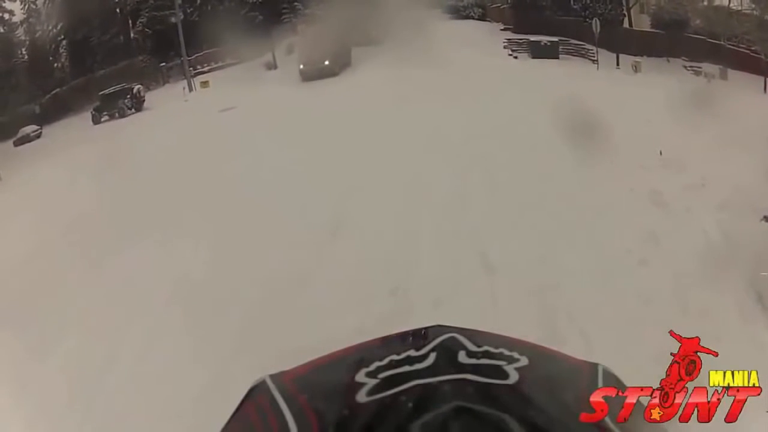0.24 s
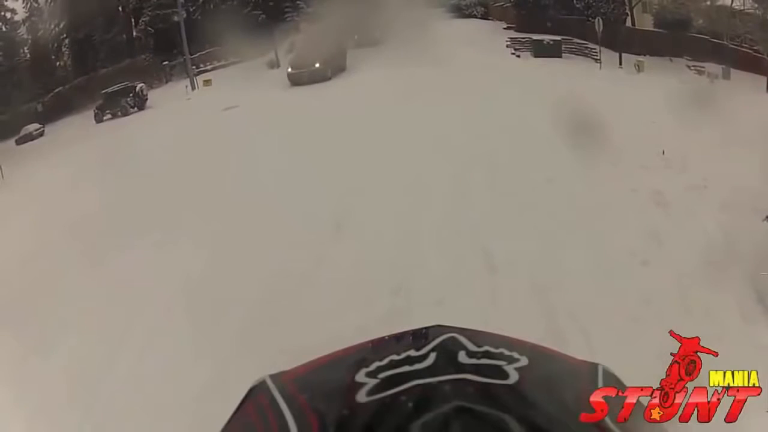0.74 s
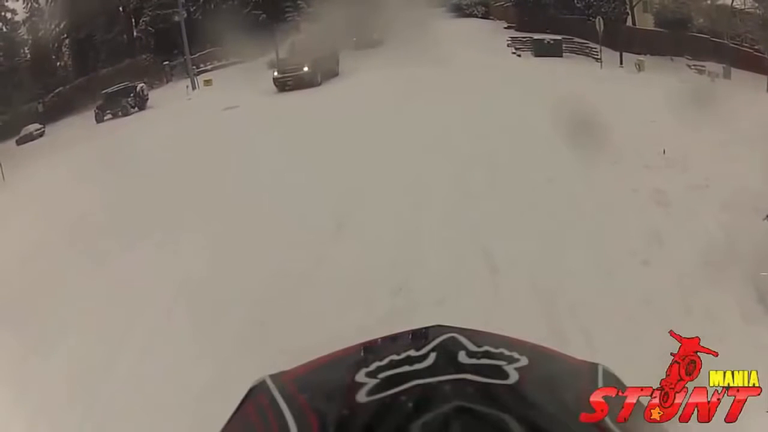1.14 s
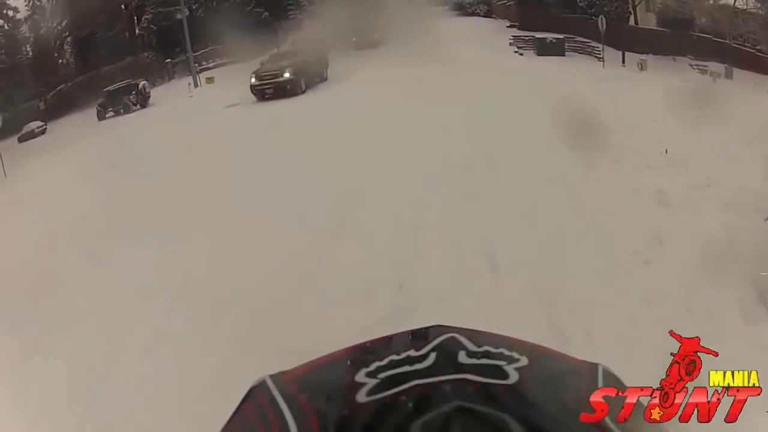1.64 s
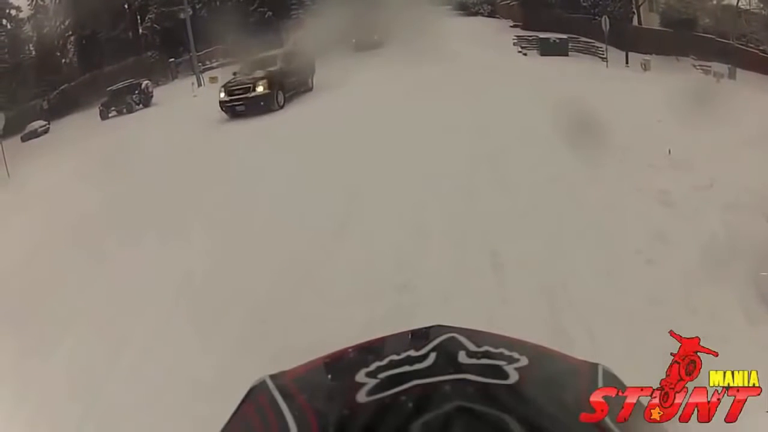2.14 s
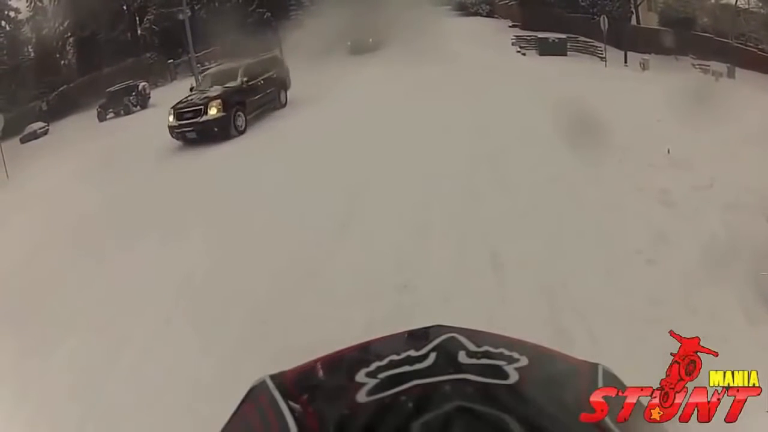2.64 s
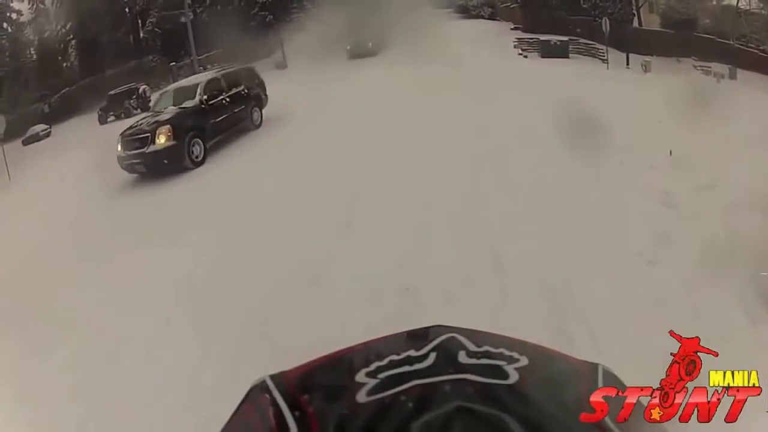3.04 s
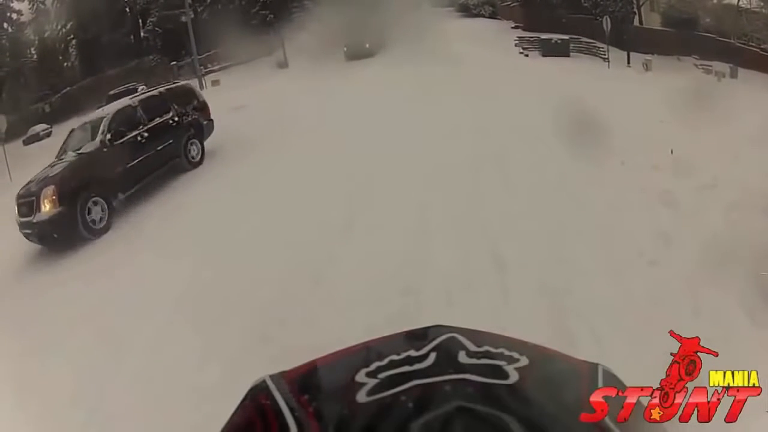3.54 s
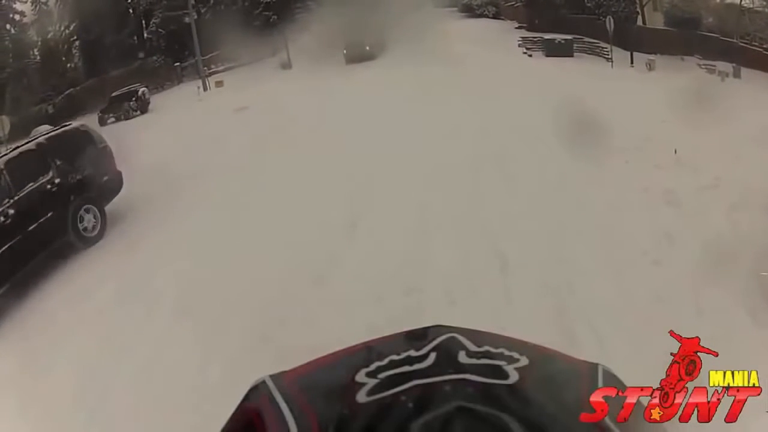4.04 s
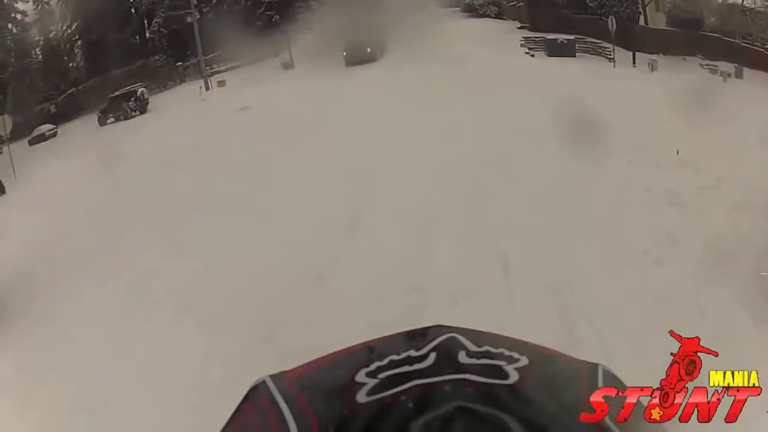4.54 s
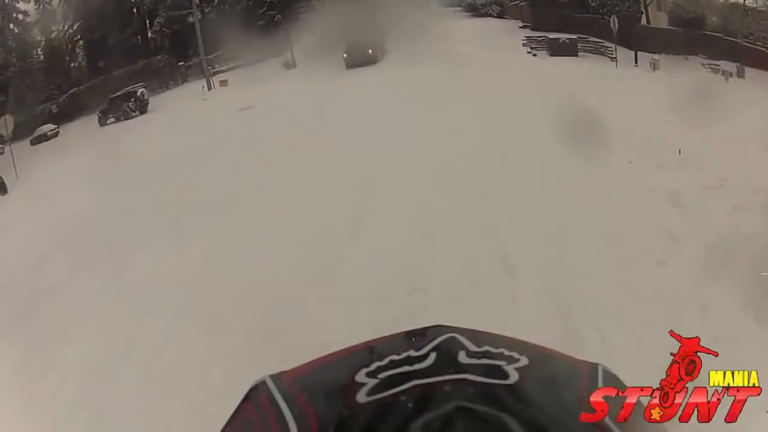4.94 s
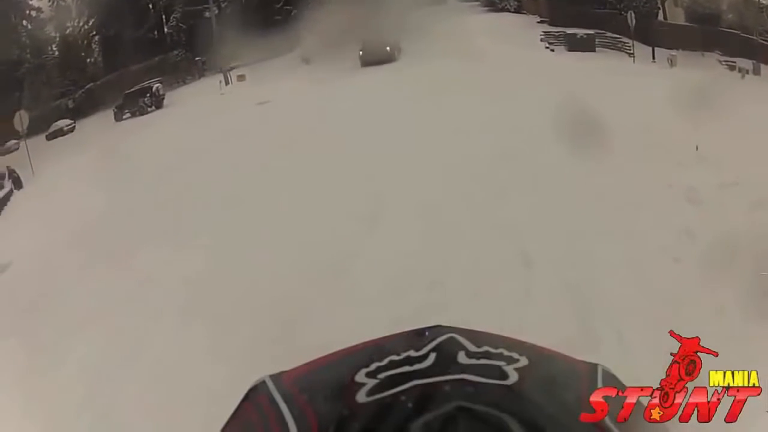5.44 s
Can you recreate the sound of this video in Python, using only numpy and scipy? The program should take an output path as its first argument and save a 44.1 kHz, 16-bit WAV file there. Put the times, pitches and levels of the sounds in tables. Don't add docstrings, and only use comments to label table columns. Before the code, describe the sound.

A two-stroke quad engine idles fast and unevenly close up, distorted and muffled, jumping abruptly louder early on and then holding steady.

```python
import sys
import numpy as np
from scipy import signal
from scipy.fft import rfft, irfft
from scipy.io import wavfile
from scipy.ndimage import uniform_filter1d, minimum_filter1d

SR = 44100
rng = np.random.default_rng(int(sys.argv[2]) if len(sys.argv) > 2 else 0)


def voltage_ratio(decibels):
    exponent = np.asarray(decibels, float) / 20
    return 10 ** exponent


def persist_wave(psi):
    counts = np.round(np.clip(psi, -1, 1) * 32767).astype(np.int16)
    wavfile.write(sys.argv[1], SR, np.atleast_2d(counts).T)


N = 250929
TURNS_PER_S = 60.5
OVERLOAD_DB = -6


def evened(x):
    return x / np.sqrt(np.mean(x ** 2) + 1e-20)


# start in seconds, blow in dB,
# delay of the second in seconds, its blow in dB.
HARD_PAIRS = [(0.0073, 3.5, 0.0151, -11.5), (0.1209, 3, 0.0492, 1.9), (0.2812, 2, 0.049, 0.5),
              (0.4097, 3.5, 0.0492, 1.5), (0.5406, 3.5, 0.0328, 1.8), (0.7404, 3.5, 0.0337, 0),
              (1.0085, 2, 0.0493, 3.7), (1.1735, 0.2, 0.0319, 1), (1.3059, 0.5, 0.0326, 0.9),
              (1.4191, 3.7, 0.0494, 1.0), (1.5493, 0.7, 0.0332, 0), (1.7634, 3, 0.0152, -9.5),
              (1.8422, 3.5, 0.0326, -1.7), (2.0024, 3.4, 0.0328, 2.5), (2.196, 2.5, 0.0503, 2.5),
              (2.36, 2.5, 0.0169, -1.5), (2.9619, 3, 0.0332, 0.8), (3.1433, 3, 0.0502, 3),
              (3.2597, 2.3, 0.0167, -6), (3.4065, 2.5, 0.0491, 1.7), (3.585, 2.1, 0.0165, 1.5),
              (3.684, 2, 0.0169, 3.2), (3.913, 2.7, 0.0344, 2), (4.1795, 1.5, 0.0344, 2),
              (4.4324, 2.5, 0.0509, 1.7), (4.5511, 3, 0.0512, -1), (4.6845, 0.3, 0.0171, 1.5),
              (4.7519, 1.9, 0.0334, 3.5), (5.2712, 1.6, 0.033, 2), (5.4953, 1, 0.0327, 1)]
# start in seconds, blow in dB.
MORE_HARD_FIRINGS = [(0.0873, 0.2), (0.2015, -0.2), (0.908, 3), (0.9761, 1.8), (1.157, 2.5), (1.6484, -0.5),
                     (1.6808, -1.7), (2.067, 0), (2.2624, -0.5), (2.49, 0.5), (2.5073, 1.5), (2.6243, -0.9),
                     (2.6586, -0.5), (3.0285, -1.5), (3.4551, 1.3), (3.4722, 0.4), (3.5195, 1.5), (3.7789, -1),
                     (4.0959, 3.5), (4.8985, 4.5), (5.0296, 4.5), (5.143, 3), (5.3363, 2.1), (5.4625, 0),
                     (0.9248, 0), (1.615, -1.5), (2.0519, -3.5), (2.409, 0.5), (3.9652, -2), (5.2544, -.5)]
# catch in seconds, dead time before it in seconds,
# blow on catching in dB.
STALLS = [(0.0552, 0.033, -2.5), (0.2479, 0.033, -5), (0.3773, 0.033, -3.5), (1.1058, 0.033, -5),
          (1.2723, 0.05, -2.5), (1.9694, 0.033, -3), (2.1459, 0.05, -0.5), (2.309, 0.033, -5.5),
          (2.4738, 0.033, -0.5), (3.1259, 0.033, -3), (3.3567, 0.033, 3), (3.569, 0.033, -1.5),
          (3.6501, 0.033, -3), (4.0607, 0.033, -5.5), (4.315, 0.033, 2.3), (5.11, 0.05, 3),
          (5.3827, 0.033, 0), (5.6578, 0.033, -0.2)]
# catch one turn later in seconds, blow on catching in dB.
MISFIRES = [(0.4908, -0.5), (0.6218, 1), (0.8243, -3), (0.8578, 0), (1.0409, -11), (1.5323, -10.5),
            (1.7299, 2), (1.8088, -7), (1.9224, 2), (2.1793, -2), (2.3434, -0.5), (2.5905, -0.5),
            (2.743, 1), (2.8288, 2.5), (3.0766, 3.4), (3.3082, 1.7), (3.747, -1), (3.8288, 0.5),
            (4.2477, -0.5), (4.398, 0), (4.585, 1), (4.6346, -8.5), (4.865, -11.5), (4.9459, 4),
            (5.1895, 0.5), (5.2213, -9), (5.414, -0.5), (5.4455, -1.5), (5.5769, -5.5), (5.6098, 3.3)]


def marked():
    first = [(s, db) for s, db, _, _ in HARD_PAIRS]
    second = [(s + later_s, db) for s, _, later_s, db in HARD_PAIRS]
    catches = [(s, db) for s, _, db in STALLS]
    return np.array(sorted(first + second + MORE_HARD_FIRINGS + MISFIRES + catches))


def shaft():
    s = marked()[:, 0]
    turns = np.r_[0, np.cumsum(np.round(np.diff(s) * TURNS_PER_S))]
    times = np.r_[-1, s, s[-1] + 1]
    return times, np.r_[-(s[0] + 1) * TURNS_PER_S, turns, turns[-1] + TURNS_PER_S]


def firings():
    ordinary_db, starved_db, stalled_db, misfired_db = -3, -6, -15.5, -14.5
    scatter_db, cap_db, hard_db = -1.5, -2.5, 1.0
    s, turns = shaft()
    at = np.interp(np.arange(turns[-2] + 2), turns, s)
    turn, marked_db = turns[1:-1].astype(int), marked()[:, 1]

    charge_db = np.full(len(at), float(ordinary_db))
    hard = turn[marked_db > hard_db]
    charge_db[np.r_[hard[1:] - 1, hard + 1]] = starved_db
    chance = np.clip(rng.standard_normal(len(at)), -2, 2)
    blow_db = np.minimum(charge_db + scatter_db * chance, cap_db)

    half_turn_s = 0.5 / TURNS_PER_S
    dead_spans = [(catch, dead_s, stalled_db) for catch, dead_s, _ in STALLS]
    dead_spans += [(catch, 2 * half_turn_s, misfired_db) for catch, _ in MISFIRES]
    for catch, dead_s, db in dead_spans:
        blow_db[(at > catch - dead_s - half_turn_s) & (at < catch - half_turn_s)] = db
    blow_db[turn] = marked_db
    return at, blow_db


# frequency in Hz, level in dB, t60 in seconds.
PIPE_MODES = [(120.5, -41, 0.36), (243.8, -11, 0.077), (319.4, -10, 0.082), (345.6, -8.5, 0.11),
              (500, -51.5, 0.22), (562.5, -15.5, 0.03), (612.4, -30, 0.097), (694, -18.5, 0.067),
              (44, -54, 0.0099)]


def exhaust(at, blow_db):
    rise_s, lag_rad, detune, uneven_db = 0.0018, -0.3, 0.007, 1.1
    ringing_share = 0.71
    hz, db, t60_s = np.transpose(PIPE_MODES)[:, :, None]
    lead, out = 300, np.zeros(N + 6000)
    t = (np.arange(4000) - lead) / SR
    swell = np.exp(-(np.minimum(t, 0) / rise_s) ** 2)
    fade = voltage_ratio(db - 60 * np.maximum(t, 0) / t60_s) * swell / voltage_ratio(db).sum()
    phase = lag_rad * np.tanh(t / rise_s)
    chance = rng.standard_normal((len(at), 2, len(hz), 1))
    for s, level_db, (pitch, size) in zip(at, blow_db, chance):
        size = voltage_ratio(uneven_db * size)
        size = size * voltage_ratio(db).sum() / (size * voltage_ratio(db)).sum()
        ring = size * fade * np.cos(2 * np.pi * hz * (1 + detune * pitch) * t + phase)
        part = out[round(s * SR):][:len(t)]
        push = max(voltage_ratio(level_db) - ringing_share * part[lead], 0)
        part += push * ring.sum(0)
    return voltage_ratio(OVERLOAD_DB) * out[lead:lead + N]


# multiple of shaft speed, level in dB rms.
SHAFT_ORDERS = [(1, -53.5), (2, -40.5), (3, -56.5), (4, -34.5), (10, -45.5)]


def pumping():
    wander_db = 1.5
    turns = np.interp(np.arange(N) / SR, *shaft())
    noise = rng.standard_normal((len(SHAFT_ORDERS), N))
    slow = uniform_filter1d(uniform_filter1d(noise, 1500), 1500)
    out = np.zeros(N)
    for (order, db), wander in zip(SHAFT_ORDERS, slow):
        level = np.sqrt(2) * voltage_ratio(db + wander_db * evened(wander))
        out += level * np.cos(2 * np.pi * order * turns)
    return out


def resonate(x, hz, width_hz):
    b, a = signal.iirpeak(hz, hz / width_hz, SR)
    return signal.lfilter(b, a, signal.lfilter(b, a, x))


# frequency in Hz, density in dB per Hz.
RUSH_SPECTRUM = [(12, -60.5), (20, -23), (70, -25), (114, -15.5), (181, -16), (236, -10), (339, -18),
                 (412, -13), (607, -8.5), (831, -28), (2240, -52), (3140, -49), (6500, -66), (8450, -101),
                 (14300, -120)]
# frequency in Hz, width in Hz, level in dB rms.
FINS = [(2704, 300, -60.5), (3110, 140, -62)]


def rush(at, blow_db):
    rush_db, split_hz = -24.5, 1100
    puff_steady, puff_s = 0.45, 0.0095
    hiss_steady, hiss_s, hiss_lead_s, hiss_waver_db = 1.0, 0.007, 0.0029, 1.04
    kicks = np.zeros(N)
    kicks[np.clip(np.round(at * SR).astype(int), 0, N - 1)] = voltage_ratio(blow_db)
    t = np.arange(-2000, 2001) / SR
    puff_shape = np.exp(-abs(t) / puff_s) * (t >= 0)
    hiss_shape = np.exp(-((t + hiss_lead_s) / hiss_s) ** 2)
    puffs = puff_steady + evened(signal.oaconvolve(kicks, puff_shape, "same"))
    hiss = hiss_steady + evened(signal.oaconvolve(kicks, hiss_shape, "same"))
    waver = evened(uniform_filter1d(rng.standard_normal(N), 900))
    hiss = hiss * voltage_ratio(hiss_waver_db * waver)

    gas_noise, metal_noise = rng.standard_normal((2, N))
    hz = np.fft.rfftfreq(N, 1 / SR)
    low = 1 / (1 + (hz / split_hz) ** 6)
    drive = low * rfft(evened(gas_noise * puffs))
    drive += (1 - low) * rfft(evened(gas_noise * hiss))
    table_hz, table_db = np.transpose(RUSH_SPECTRUM)
    colour = voltage_ratio(np.interp(np.log(hz + 1), np.log(table_hz), table_db))
    gas = irfft(drive * colour, N)
    fins = sum(voltage_ratio(db) * evened(resonate(metal_noise * hiss, f, width)) for f, width, db in FINS)
    return voltage_ratio(rush_db) * evened(gas) + fins


def scene():
    at, blow_db = firings()
    return (exhaust(at, blow_db) + pumping() + rush(at, blow_db))[None]


def held(x):
    hold_hz = 12000
    size = SR * (N // SR + 1)
    hz = np.fft.rfftfreq(size, 1 / SR)
    z = rfft(x, size) * (hz < hold_hz / 2)
    shift = hold_hz * size // SR
    half = z[:shift // 2]
    z[shift:shift + len(half)] += half
    z[shift - len(half) + 1:shift] += np.conj(half[:0:-1])
    return irfft(z * np.sinc(hz / hold_hz), size)[:N]


def coarse(x):
    mask_db, grit_db, waver_db = -17, -16, 3.0
    from_hz, edge_hz, band_bins = 5000, 15700, 8
    hz, _, z = signal.stft(x, SR, nperseg=1024, noverlap=768)
    band = np.arange(len(hz)) // band_bins
    power = np.add.reduceat(abs(z) ** 2, np.arange(0, len(hz), band_bins)) / band_bins
    power_db = 10 * np.log10(power + 1e-20)
    loudest_db = -minimum_filter1d(-power_db, size=11, axis=0)
    waver = evened(uniform_filter1d(rng.standard_normal(power_db.shape), size=4, axis=1))
    kept = power_db + waver_db * waver > loudest_db + mask_db
    real, imag = rng.standard_normal((2, *z.shape))
    grit = voltage_ratio(power_db + grit_db)[band] * (real + 1j * imag)
    gritty = (z + grit) * kept[band]
    z = np.where(hz[:, None] > from_hz, gritty, z)
    z = z / (1 + (hz[:, None] / edge_hz) ** 120)
    return signal.istft(z, SR, nperseg=1024, noverlap=768)[1][:N]


def roll_off(x):
    return signal.sosfilt(signal.butter(12, 15770, fs=SR, output="sos"), x)


def record(dry):
    raise_s, raise_db, ramp_s = 1.2488, 11.5, 0.0008
    full_scale = voltage_ratio(OVERLOAD_DB)
    clipped = np.clip(dry[0], -full_scale, full_scale)
    cut = signal.lfilter(*signal.butter(1, 10, "high", fs=SR), clipped)
    level_db = np.interp(np.arange(N) / SR, [raise_s, raise_s + ramp_s], [-raise_db, 0])
    mix = coarse(held(cut)) * voltage_ratio(level_db)
    return roll_off(mix[None])


dry = scene()
out = record(dry)
persist_wave(out)
```